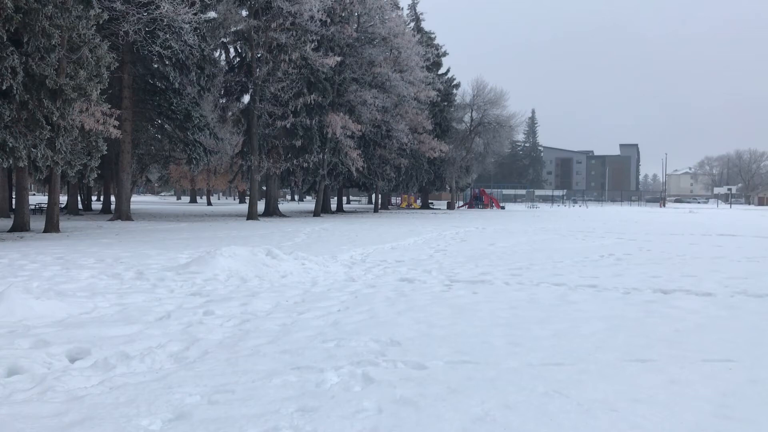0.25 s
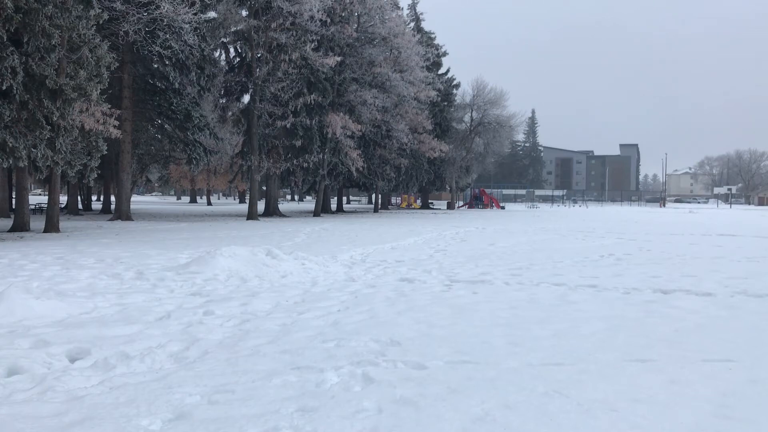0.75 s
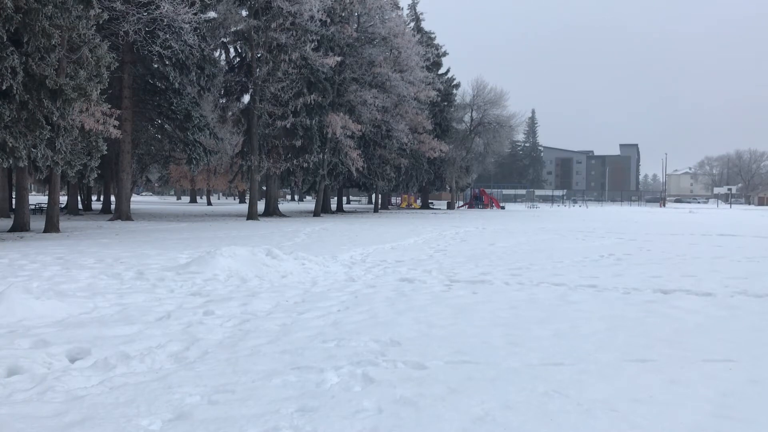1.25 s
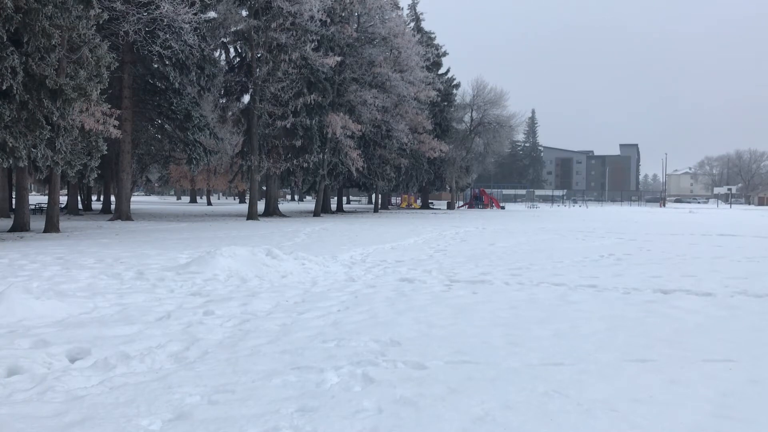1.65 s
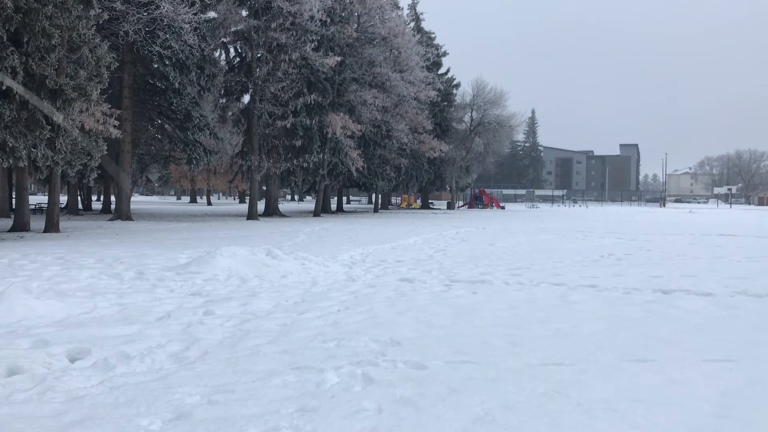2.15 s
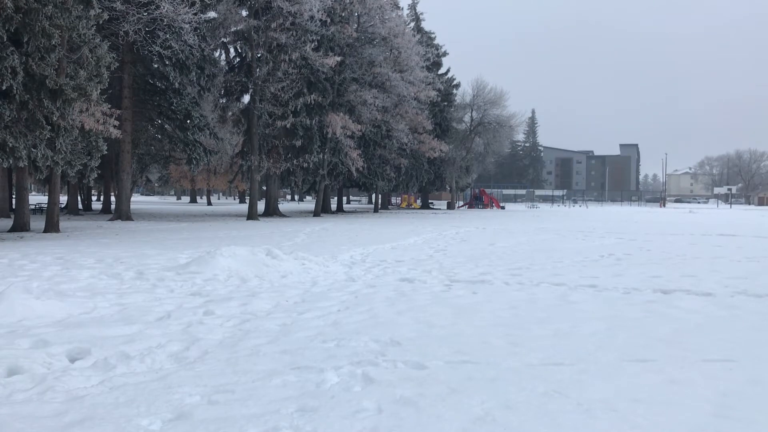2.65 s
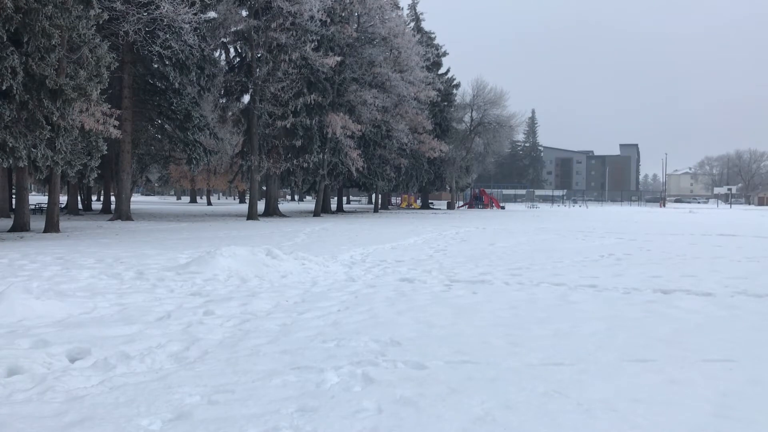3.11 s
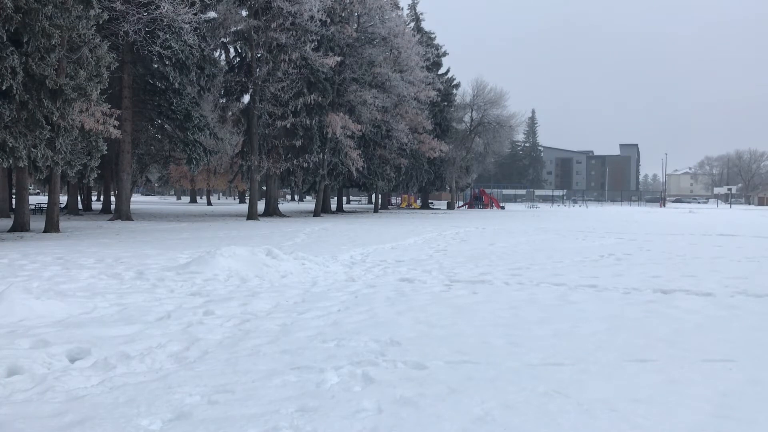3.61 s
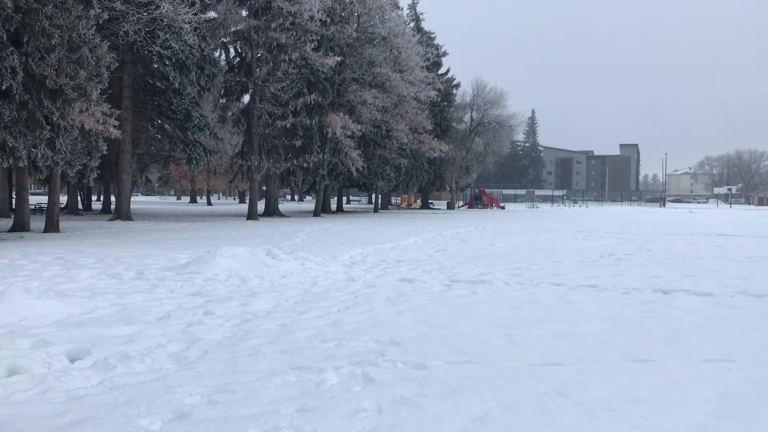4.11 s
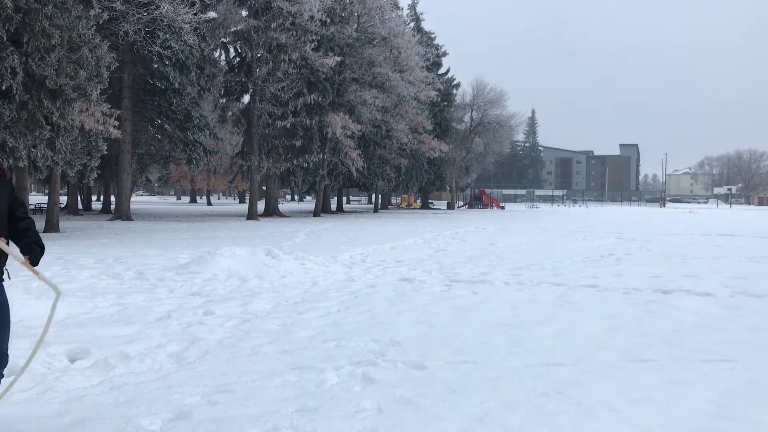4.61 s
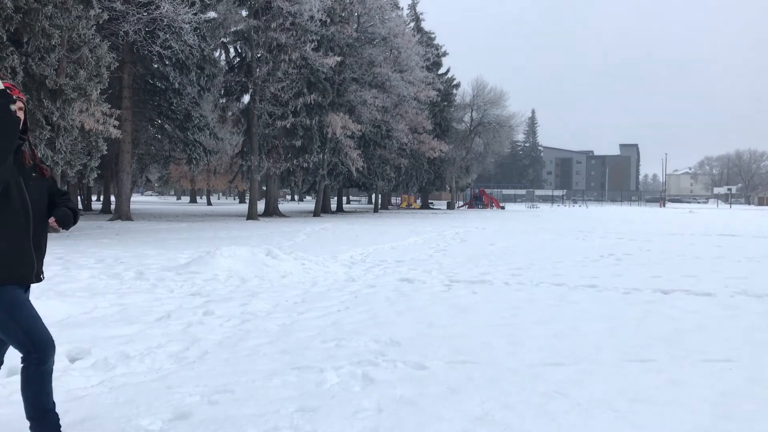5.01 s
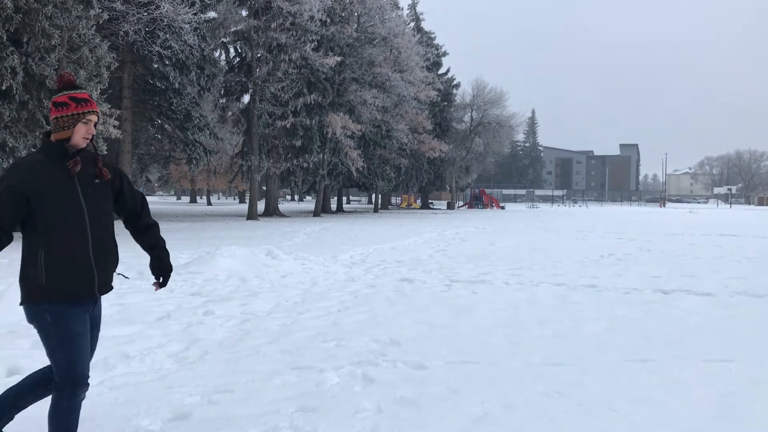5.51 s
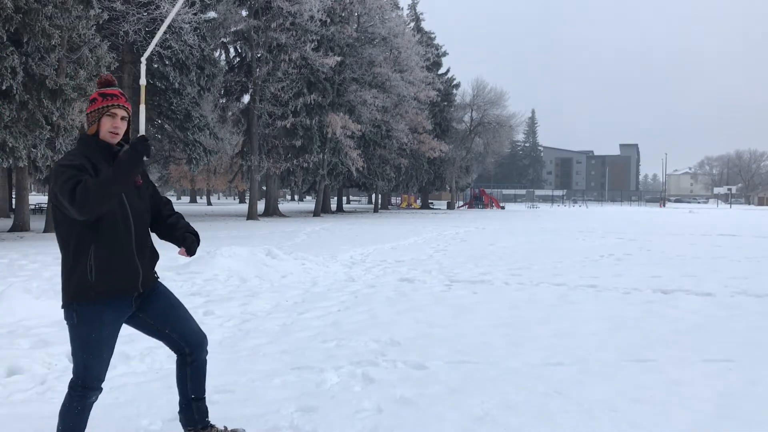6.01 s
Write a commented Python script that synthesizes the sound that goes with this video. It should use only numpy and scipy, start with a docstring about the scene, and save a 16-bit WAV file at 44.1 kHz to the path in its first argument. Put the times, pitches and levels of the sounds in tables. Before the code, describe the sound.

In a quiet snowy park, a long whip whistles through the air and cracks hard, first at just over a second, then twice more at intervals. A throw that only whistles follows, then two quick cracks. Each snap scatters back from spruces and distant walls. Snow crunches and jacket rustle lightly, air thuds at the microphone, and two soft swishes close.

```python
"""A long whip is swung and cracked on a snowy field, over a faint low murmur of shaped noise, rustle and snow crunches.
A slow swing whistles by in wavering tones; at 1.3 s a run-up of torn noise ends in the first crack, a pressure jump.
More swings lead to cracks at 2.8 and 4.15 s; a throw at 4.9 s only whistles, then cracks at 5.4 and 5.7 s follow.
Spruces answer the cracks with scattered noise and walls with dull snaps; air puffs thud at the microphone.
Two last swings close the scene at about 6 s."""
import sys
import numpy as np
from scipy import signal
from scipy.fft import rfft, irfft, next_fast_len
from scipy.io import wavfile
from scipy.ndimage import map_coordinates

SR = 44100
rng = np.random.default_rng(int(sys.argv[2]) if len(sys.argv) > 2 else 0)


def digitize_waveform(pressure):
    """Quantize a signal to 16-bit integers and store it at the path in sys.argv[1].

    Rows of a 2-D input are taken as channels; values are limited to [-1, 1].
    """
    field = np.atleast_2d(pressure).T
    bounded = np.clip(field, -1, 1)
    quanta = np.round(bounded * 32767).astype(np.int16)
    wavfile.write(sys.argv[1], SR, quanta)


N = 275869
TIME = np.arange(N) / SR


def gain_of(db):
    """Decibels to amplitude."""
    return 10 ** (np.asarray(db) / 20)


def evened(x):
    """Scales to rms 1."""
    return x / np.sqrt(np.mean(x ** 2) + 1e-20)


def read(points, hz):
    """A spectrum joined by straight lines over log frequency."""
    point_hz, value = np.transpose(points)
    return np.interp(np.log(hz + 1), np.log(point_hz + 1), value)


def add(mix, s, sound):
    """Mixes a sound in from time s, trimmed to the scene."""
    start = round(s * SR)
    sound = sound[max(-start, 0):]
    part = mix[max(start, 0):][:len(sound)]
    part += sound[:len(part)]


def coloured(x, spectrum, tilt_db=0):
    """Filters by a spectrum, with a tilt in dB per octave that sets in above the bass."""
    size = next_fast_len(len(x))
    hz = np.fft.rfftfreq(size, 1 / SR)
    octaves = np.log2(1 + hz / 250)
    gain = gain_of(read(spectrum, hz) + tilt_db * octaves)
    return irfft(rfft(x, size) * gain, size)[:len(x)]


def coloured_noise(count, spectrum, tilt_db=0):
    """White noise shaped by a spectrum, at rms 1."""
    return evened(coloured(rng.standard_normal(count), spectrum, tilt_db))


def wander(count, hz):
    """Random drift of rms 1: straight lines between hz chance values a second."""
    knots = rng.standard_normal(count)
    return evened(map_coordinates(knots, [np.arange(count) * hz / SR], order=1, mode="wrap"))


def passage(rise, fall):
    """Start in seconds, and time around a fly-by in units of its rise and fall, 0.3 s to either side."""
    t = np.arange(-13230, 13230) / SR
    return t[0], t / np.where(t < 0, rise, fall)


def fading(ticks, fade):
    """Lets every tick die away exponentially, with a time constant in seconds."""
    return signal.lfilter([1], [1, -np.exp(-1 / (fade * SR))], ticks)


# Colour of the open air. Each row: frequency in Hz, level in dB.
AIR_SPECTRUM = [(12, -38), (20, -8.5), (60, 1), (101, -16), (134, -13), (347, -11.5), (399, -15.5),
                (802, -14), (873, -12.5), (1190, -16.5), (3160, -29.5), (4940, -40), (16000, -46)]


def air(db=-58, swell_db=3.0):
    """Far town noise and light wind: shaped noise whose level drifts about three times a second."""
    level_db = db + swell_db * wander(N, 3.14)
    return gain_of(level_db) * coloured_noise(N, AIR_SPECTRUM)


# Colour of snow, for rustle and scuffs. Each row: frequency in Hz, level in dB.
SNOW_SPECTRUM = [(40, -16), (200, 3.5), (600, -3), (2000, -5), (5000, -3), (9000, -2.5), (16000, -4)]
# Motion of jacket and dragging lash. Each row: time in seconds, level in dB.
RUSTLE_MOTION = [(0.0, -66.5), (1.01, -82), (1.25, -91), (1.46, -71.5), (1.71, -65.5), (2.7, -74.5),
                 (2.91, -73.5), (3.29, -65.5), (3.82, -83.5), (4.04, -90), (4.13, -75), (4.29, -57),
                 (4.35, -52.5), (4.89, -68.5), (5.42, -69.5), (5.57, -54.5), (5.99, -61.5), (6.26, -70.5)]


def rustle(per_s=30, tick_db=0, spread_db=8.5, fade=0.0022, tilt_db=0.3, soft_db=-0.5):
    """Cloth and lash slide as soft noise and stray grains of crust tick, both following the body's motion."""
    struck = rng.random(N) < per_s / SR
    ticks = struck * gain_of(tick_db + spread_db * np.minimum(rng.exponential(1, N), 3))
    motion = gain_of(np.interp(TIME, *np.transpose(RUSTLE_MOTION)))
    texture = gain_of(soft_db) + fading(ticks, fade)
    return motion * texture * coloured_noise(N, SNOW_SPECTRUM, tilt_db)


# Boots and lash in the snow. Each row: loudest moment in seconds, level in dB before the swell shapes it,
# length in seconds (rise plus fall scale), tilt in dB per octave.
SNOW_SCUFFS = [ (0.023, -33, 0.0011, 0), (0.035, -38, 0.005, 1.5), (0.573, -44.5, 0.0012, 3),
               (1.354, -19, 0.0024, 2), (1.421, -45.5, 0.014, -.5), (1.552, -48.5, 0.023, 0.5),
               (1.886, -55, 0.021, -1.5), (2.193, -41, 0.0036, -1), (2.843, -40, 0.018, 3.5),
               (3.242, -39, 0.0054, 9.5), (3.273, -49, 0.046, 2), (3.283, -47.5, .02, -16),
               (3.477, -29.5, 0.0023, 2.5), (3.618, -52, 0.028, -11), (4.18, -29, .005, 0),
               (4.202, -29, 0.0097, 2), (4.509, -44.5, 0.039, -2), (5.092, -42.5, 0.0053, -6),
               (5.153, -40, 0.005, -1), (5.163, -41, 0.013, 2), (5.466, -23.5, 0.0093, 1.5),
               (5.796, -38.5, 0.031, 2), (5.893, -40, 0.015, 18)]


def snow(grain_db=9.5, clump_db=3, clump_hz=300, steep=0.86, rise_share=0.41):
    """Crushed snow: clumps of tiny fractures under each step or touch of the lash."""
    out = np.zeros(N)
    for s, db, length, tilt_db in SNOW_SCUFFS:
        lead, u = passage(length * rise_share, length * (1 - rise_share))
        grains_db = grain_db * np.minimum(rng.exponential(1, len(u)), 4)
        size_db = grains_db + clump_db * wander(len(u), clump_hz)
        fractures = rng.standard_normal(len(u)) * gain_of(size_db)
        crunch = evened(coloured(fractures, SNOW_SPECTRUM, tilt_db))
        add(out, s + lead, gain_of(db) * crunch / (1 + u ** 2) ** steep)
    return out


# Colour of early forest returns. Each row: frequency in Hz, level in dB.
NEAR_ECHO_SPECTRUM = [(100, -13.5), (400, -11), (900, 1.5), (1600, -1.5), (3000, 0.5), (4700, -5.5),
                      (7500, -17.5), (16000, -31)]
# Colour of late forest returns. Each row: frequency in Hz, level in dB.
FAR_ECHO_SPECTRUM = [(100, -21.5), (400, -15.5), (900, 4), (1600, 6.5), (2900, -1.5), (4300, -17),
                     (6500, -35.5), (16000, -37.5)]
# Stands of trees. Each row: delay in seconds, level in dB, swell before it in dB per s, decay after it in dB per s.
TREE_STANDS = [(0.098, 2, 330.5, 29), (.93, -5.5, 48, 52)]
# Cracks that carry to trees and walls. Each row: time in seconds, forest level in dB, tilt of early returns in dB
# per octave, aim at near wall in dB, aim at far walls in dB, extra delay of the last and farthest return in seconds.
ECHOED_CRACKS = [(1.327, -56.5, 3, -23.5, -26.5, 0.0046), (2.782, -44.5, 2, -24.5, -22.5, -0.0043),
                 (4.15, -43.5, 0, -14.5, -28, .025), (5.418, -42.5, 3, -18, -27, -.005),
                 (5.686, -47, -3, -17, -26, 0)]


def forest(lumpy_db=2, lumpy_hz=190, trunks_per_s=110, trunk_db=3, spread_db=3.0, trunk_fade=0.00076,
           dulling_time=0.49):
    """Boughs scatter each crack into a wash and trunks into a patter; the longer the path, the duller the return."""
    out, t = np.zeros(N), TIME[:3 * SR // 2]
    power = 0
    for delay, db, swell, decay in TREE_STANDS:
        drop_db = np.maximum(swell * (delay - t), decay * (t - delay))
        power = power + gain_of(db - drop_db) ** 2
    strength = np.sqrt(power)
    near = np.exp(-(t / dulling_time) ** 2)
    for s, db, tilt_db, *_ in ECHOED_CRACKS:
        struck = rng.random(len(t)) < trunks_per_s / SR
        trunks = struck * gain_of(trunk_db + spread_db * np.minimum(rng.exponential(1, len(t)), 2))
        boughs = gain_of(lumpy_db * wander(len(t), lumpy_hz))
        scatter = rng.standard_normal(len(t)) * (boughs + fading(trunks, trunk_fade))
        early = near * evened(coloured(scatter, NEAR_ECHO_SPECTRUM, tilt_db))
        late = (1 - near) * evened(coloured(scatter, FAR_ECHO_SPECTRUM))
        add(out, s, (early + late) * gain_of(db) * strength)
    return out


# Colour of a snap off a flat face. Each row: frequency in Hz, level in dB.
SLAP_SPECTRUM = [(100, -16), (500, -13), (1100, 6.5), (2500, 5.5), (4000, -3.5), (7000, -33.5),
                 (16000, -38.5)]
# Trunks and walls that answer each echoed crack. Each row: delay in seconds, level in dB relative to the aim.
FLAT_FACES = [(0.1023, 0.5), (0.134, -8.5), (.163, -4), (.241, -1), (.297, -2.5), (0.381, -2.5), (.503, -9),
              (.55, -7), (.747, -1.5), (.756, -2.5), (.809, -8.5), (0.951, -5.5)]
# Delays of the near wall, the trees and the far walls in seconds; a trunk's strength over the forest level in dB.
ZONE_DELAYS, TRUNK_OVER_WASH_DB = (0.11, 0.31, 0.89), 20.5


def slaps(db=-8, rise=0.00022, fade=0.0023, dulling_db_per_s=-0.5):
    """Large flat faces return a dull, compact snap; a crack's aim decides whether near or far ones answer most."""
    out, t = np.zeros(N), TIME[:2048]
    shape = np.exp(-t / fade) * (1 - np.exp(-t / rise))
    for s, forest_db, _, near_db, far_db, last_extra in ECHOED_CRACKS:
        zone_db = (near_db, forest_db + TRUNK_OVER_WASH_DB, far_db)
        for delay, face_db in FLAT_FACES:
            level_db = np.interp(delay, ZONE_DELAYS, zone_db) + face_db + db
            snap = coloured_noise(len(t), SLAP_SPECTRUM, dulling_db_per_s * delay)  # tilt grows with delay
            arrival = s + delay + last_extra * (delay > ZONE_DELAYS[-1])
            add(out, arrival, gain_of(level_db) * snap * shape)
    return out


# Air puffs at the microphone. Each row: centre in seconds, level in dB before the pulse shape and bass cut,
# width in seconds.
AIR_PUFFS = [(0.7833, -29.5, 0.0017), (1.3135, -5, 0.00026), (1.3275, -7, 0.0007), (1.331, 8, 0.0038),
             (1.448, -17, 0.0025), (2.7696, -11.5, 0.00026), (2.7859, -12.5, 0.0011), (4.155, -15, 0.0018),
             (5.423, -23.5, 0.0024), (5.6881, 0, 0.00097), (5.6886, 7, 0.0061)]


def puffs(low_cut_hz=50):
    """A passing vortex pulls, then pushes; the microphone's bass cut turns that into a short thud."""
    out = np.zeros(N)
    for s, db, width in AIR_PUFFS:
        lead, u = passage(width, width)
        add(out, s + lead, gain_of(db) * u / np.sqrt(1 + u ** 2) ** 3)
    return signal.sosfilt(signal.butter(4, low_cut_hz, "high", fs=SR, output="sos"), out)


# Colour of the thick thong. Each row: frequency in Hz, level in dB.
THONG_SPECTRUM = [(80, -12.5), (220, 3), (370, 2.5), (600, -1.5), (1050, 1.5), (1800, -13), (5000, -23.5),
                  (16000, -25)]


def wind_ups(rise=0.044, fall=0.0057):
    """The thick part of the thong whooshes low as the loop gathers speed: noise that swells, then drops fast."""
    out = np.zeros(N)
    for s, *_, db in FAST_THROWS:
        lead, u = passage(rise, fall)
        add(out, s + lead, gain_of(db) * coloured_noise(len(u), THONG_SPECTRUM) / (1 + u ** 2))
    return out


def whistle(s, db, rise, fall, pitch, steep=1.39, jitter=0.0312, width=.11, overtone_db=-21):
    """Vortices leave the thong at a pitch that follows its speed; turbulence smears the tone into a narrow hiss."""
    smeared = .45  # share of the power
    lead, u = passage(rise, fall)
    bend = [-np.tanh(1), 0, np.tanh(1)]  # the outer pitches are reached two rises before and two falls after
    hz = np.exp(np.interp(np.tanh(u / 2), bend, np.log(pitch)))
    phase = 2 * np.pi * np.cumsum(hz * (1 + jitter * wander(len(u), pitch[1] / 2))) / SR
    eddy_hz = 2 * width * pitch[1]
    eddies = wander(len(u), eddy_hz) + 1j * wander(len(u), eddy_hz)
    strength = np.sqrt(2 * (1 - smeared)) + np.sqrt(smeared) * eddies
    tone = strength * (np.exp(1j * phase) + gain_of(overtone_db) * np.exp(2j * phase))
    return s + lead, gain_of(db) * tone.real / (1 + u ** 2) ** steep


# Colour of torn air. Each row: frequency in Hz, level in dB.
RUSH_SPECTRUM = [(60, -2.5), (300, -1.5), (700, -1), (2000, 2.5), (4500, 0.5), (8000, -4.5), (16000, -10.5)]


def rush(s, db, rise, fall, tilt_db, steep=1.04, ragged_db=5.0, ragged_hz=900):
    """The frayed tip tears the air: ragged noise that peaks at time s."""
    lead, u = passage(rise, fall)
    noise = rng.standard_normal(len(u)) * gain_of(ragged_db * wander(len(u), ragged_hz))
    return s + lead, gain_of(db) * evened(coloured(noise, RUSH_SPECTRUM, tilt_db)) / (1 + u ** 2) ** steep


# Slow passes of the whip. Each row: time in seconds, stretch in time as a factor, pitch in Hz, belly lag in seconds,
# belly, middle and thin end levels in dB, hiss level in dB, hiss width in seconds, hiss tilt in dB per octave.
SLOW_SWINGS = [ (.786, 0.91, 1592, -.018, -44, -36, -66, -34.5, 0.0046, 0),
               (2.262, 0.29, 1686, -0.0087, -41, -33, -49, -40, 0.0022, -6),
               (2.276, 1.24, 1629, -.003, -37.5, -32, -40.5, -48, 0.021, 3),
               (3.651, 0.97, 1826, 0.003, -38, -30.5, -33.5, -45, 0.025, 3),
               (4.902, 1.56, 1640, -0.024, -52, -37.5, -45.5, -52.5, .024, -3),
               (5.985, 0.59, 1893, -0.013, -50, -40.5, -44.5, -45, 0.016, -5.5),
               (6.005, 1.17, 1394, 0.017, -45, -41.5, -48, -50.5, 0.037, -3.5)]
# Belly, middle and thin end of the thong. Each row: rise and fall in seconds before the stretch,
# pitch before, at loudest and after as ratios to the swing's pitch.
SINGING_PARTS = [(0.0123, 0.0255, .55, .64, .53), (0.00836, .02, 1.2, 1, .71),
                 (0.0114, 0.0158, 1.45, 1.66, 1.35)]


def swings(thin_lead=0.0041, hiss_lead=.004):
    """Three thicknesses of the thong each sing a bending tone as they pass, over a soft hiss."""
    out = np.zeros(N)
    for s, stretch, hz, belly_lag, *levels, hiss_db, hiss_width, tilt_db in SLOW_SWINGS:
        lags = (belly_lag, 0, -thin_lead)
        for lag, db, (rise, fall, *ratios) in zip(lags, levels, SINGING_PARTS):
            add(out, *whistle(s + lag, db, rise * stretch, fall * stretch, hz * np.array(ratios)))
        add(out, *rush(s - hiss_lead, hiss_db, hiss_width, hiss_width, tilt_db))
    return out


# Fast throws. Each row: time in seconds, run-up time in seconds, run-up level in dB, run-up tilt in dB per octave,
# burst and wake levels in dB, lash tone in Hz, lash tone level in dB, tones-in level in dB, tones-in pitch ratio,
# tones-out level in dB, wind-up level in dB.
FAST_THROWS = [ (1.3268, 0.009, -16.5, 0.5, -14, -31, 5620, -30.5, -38, 1.3, -38, -44.5),
               (2.7814, 0.012, -28, 5.5, -12, -27, 5500, -32, -17.5, 1, -31.5, -45.5),
               (4.15, 0.011, -27.5, -1, -13.5, -22, 6380, -21, -14, 1.1, -20.5, -43),
               (4.881, 0.011, -40.5, 0, -50, -52, 3870, -30, -24.5, .58, -54, -49.5),
               (5.419, .016, -27, -2.5, -8.5, -21.5, 4170, -25.5, -18, .85, -22, -38),
               (5.686, 0.026, -40, -3, -17, -26.5, 4000, -41, -26, .95, -46, -48.5)]
# Tones as the loop runs in. Each row: lag in seconds, level in dB relative to the throw's, rise and fall in seconds,
# pitch before, at loudest and after in Hz before the throw's ratio.
RUN_IN_TONES = [(-.01, -10, .006, 0.0038, 1266, 1991, 2500), (-.004, -3.5, 0.0021, 0.003, 2967, 2623, 2300)]
# Tones as the tip slows down again. Each row: lag in seconds, level in dB relative to the throw's,
# rise and fall in seconds, pitch before, at loudest and after in Hz.
SLOWING_TONES = [(.008, 0.5, 0.0032, 0.0063, 4560, 3821, 3090), (.022, -6.5, .004, .009, 3070, 2008, 1167)]
# The thin lash shrieks around the run-up's peak. In order: rise and fall in seconds, pitch before and after as ratios.
LASH_SHRIEK = (.0016, 0.006, 0.88, .88)
# Torn air in the run-up, the burst and the wake. Each: rise and fall in seconds.
RUN_UP, BURST, WAKE = (0.0031, 0.012), (0.00048, 0.0015), (0.0059, 0.013)


def cracks(wake_lag=.005, burst_tilt_db=1, wake_tilt_db=2.46):
    """The loop runs in with whistling tones, the tip turns over in a burst and leaves a wake with falling tones."""
    out = np.zeros(N)
    lash_rise, lash_fall, before, after = LASH_SHRIEK
    for (s, lead, run_db, run_tilt_db, burst_db, wake_db, lash_hz, lash_db,
         in_db, in_ratio, out_db, _) in FAST_THROWS:
        add(out, *rush(s - lead, run_db, *RUN_UP, run_tilt_db))
        add(out, *rush(s, burst_db, *BURST, burst_tilt_db))
        add(out, *rush(s + wake_lag, wake_db, *WAKE, wake_tilt_db))
        lash_pitch = lash_hz * np.array([before, 1, after])
        add(out, *whistle(s - lead, lash_db, lash_rise, lash_fall, lash_pitch))
        for level_db, ratio, tones in ((in_db, in_ratio, RUN_IN_TONES), (out_db, 1, SLOWING_TONES)):
            for lag, db, rise, fall, *pitch in tones:
                add(out, *whistle(s + lag, level_db + db, rise, fall, ratio * np.array(pitch)))
    return out


# Sharp pressure jumps: the cracks, and a faint tick shortly before two of them.
# Each row: start in seconds, peak in dB before the trim and edge rounding.
PRESSURE_JUMPS = [(1.3266, 2), (1.3307, 3), (2.759, -17), (2.7823, -2), (4.15, 4), (5.4175, -8), (5.42, -7),
                  (5.6625, -32), (5.686, -7)]


def shocks(length=0.00015, edge_hz=6500, trim_db=-4.0):
    """A pressure jump with a short rebound, its edge rounded by the microphone."""
    out, u = np.zeros(N), TIME[:400] / length
    for s, peak_db in PRESSURE_JUMPS:
        add(out, s, -gain_of(peak_db + trim_db) * (1 - u) * np.exp(-u))
    return signal.sosfilt(signal.butter(2, edge_hz, fs=SR, output="sos"), out)


def scene():
    """Air, snow, echoes and whip at one microphone."""
    ground = air() + rustle() + snow()
    echoes = forest() + slaps()
    whip = puffs() + wind_ups() + swings() + cracks() + shocks()
    return (ground + echoes + whip)[None]


# Colour of the microphone. Each row: frequency in Hz, level in dB.
MICROPHONE_SPECTRUM = [(20, -0.5), (6000, 1), (7700, -2), (9300, 1.5), (10600, -3), (12500, 3.5),
                       (15000, 6.5), (16000, -8.5)]


def record(dry, threshold_db=-23, recovery_db=30, share=0.61, attack=0.014, ceiling=0.51, edge_hz=16150):
    """Microphone colour, gain control that ducks after the loudest cracks, a peak ceiling and the band limit."""
    x = coloured(dry[0], MICROPHONE_SPECTRUM)
    keep = np.exp(-1 / (attack * SR))
    smooth = [1 - keep], [1, -keep]
    power_db = 10 * np.log10(signal.lfilter(*smooth, x ** 2) + 1e-12)
    recovery = recovery_db * TIME
    held_db = np.maximum.accumulate(power_db + recovery) - recovery  # peaks sink at recovery_db per second
    over_db = np.maximum(held_db - threshold_db, 0)
    ducked = x / gain_of(share * signal.lfilter(*smooth, over_db))
    clipped = np.clip(ducked, -ceiling, ceiling)
    band_limit = signal.firwin(301, edge_hz, window=("kaiser", 8), fs=SR)
    return signal.oaconvolve(clipped, band_limit, "same")[None]


dry = scene()
out = record(dry)
digitize_waveform(out)
```